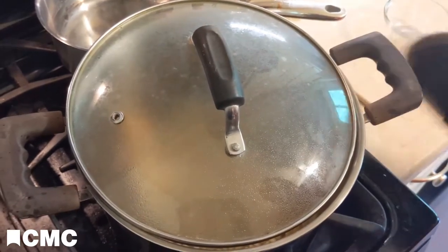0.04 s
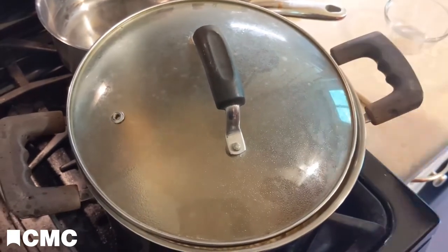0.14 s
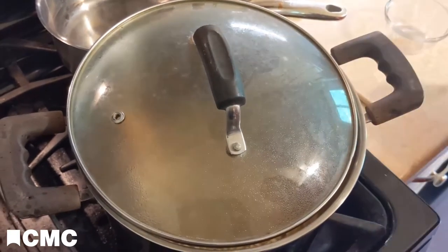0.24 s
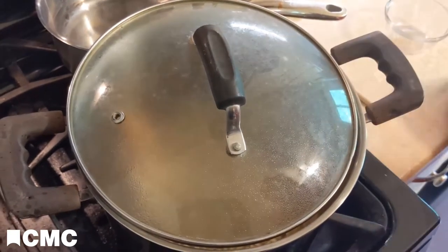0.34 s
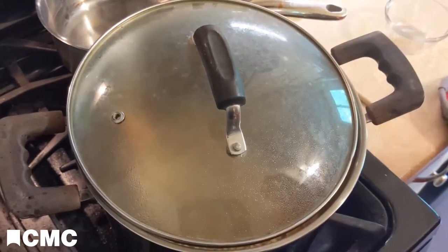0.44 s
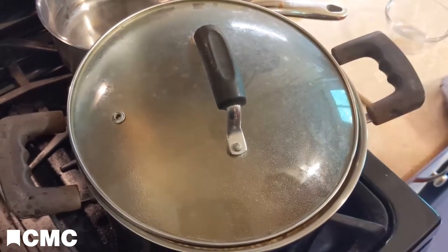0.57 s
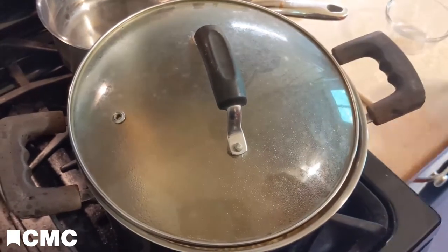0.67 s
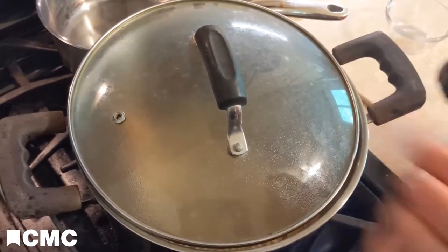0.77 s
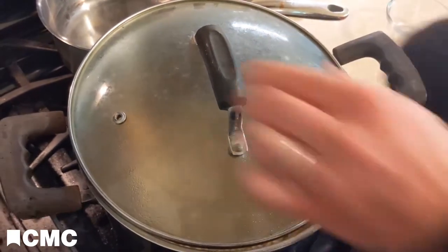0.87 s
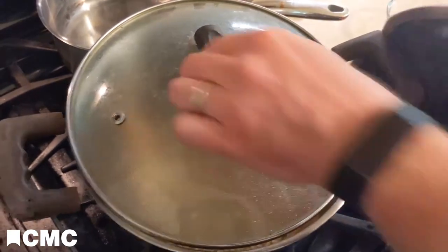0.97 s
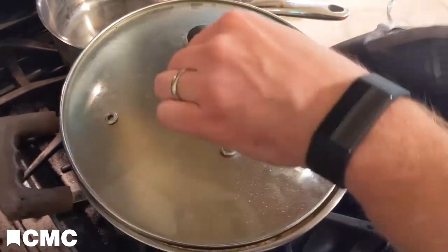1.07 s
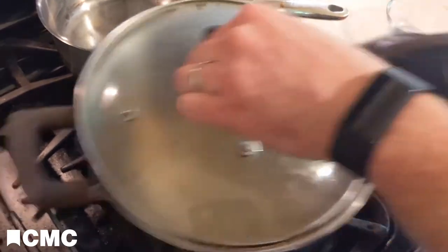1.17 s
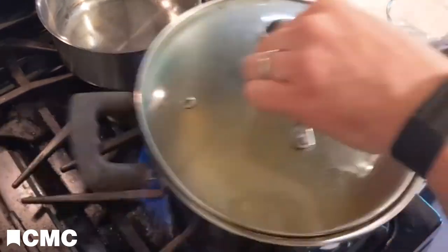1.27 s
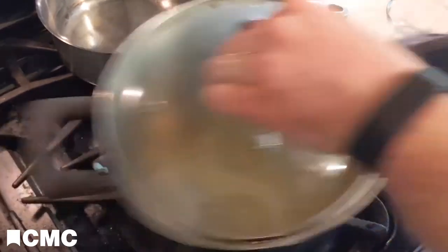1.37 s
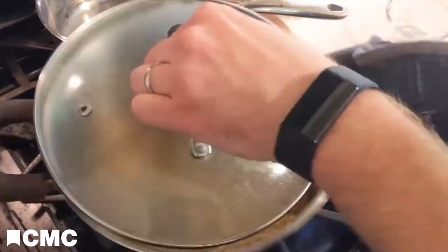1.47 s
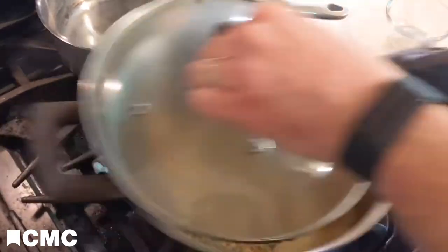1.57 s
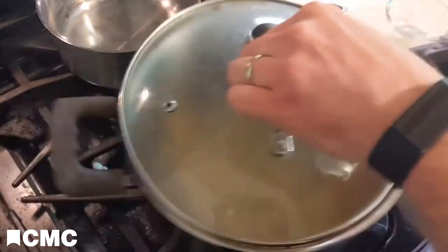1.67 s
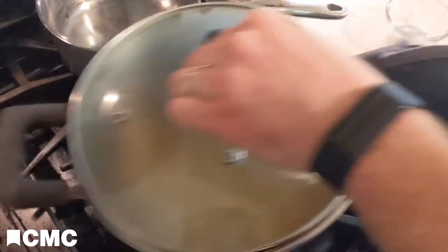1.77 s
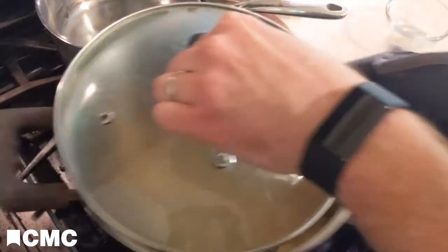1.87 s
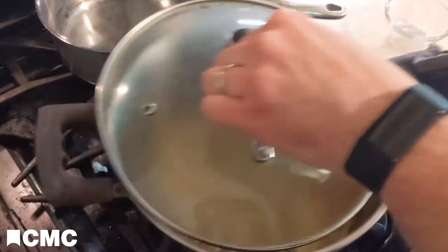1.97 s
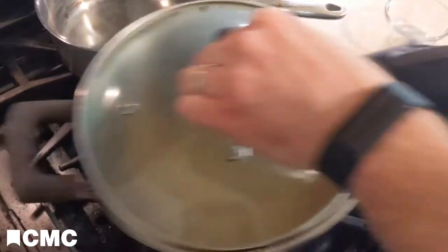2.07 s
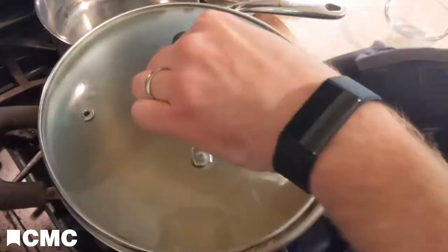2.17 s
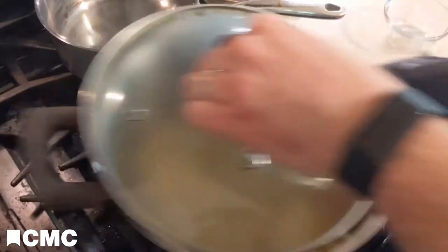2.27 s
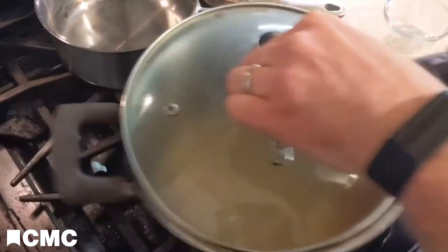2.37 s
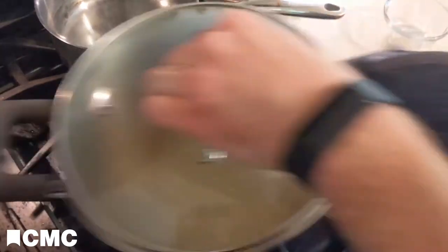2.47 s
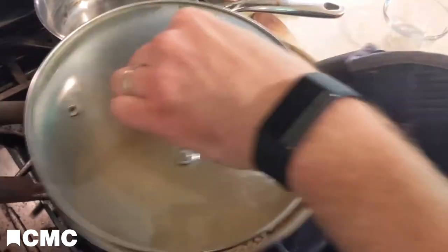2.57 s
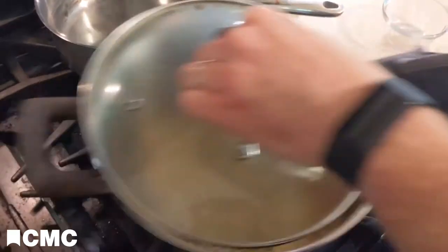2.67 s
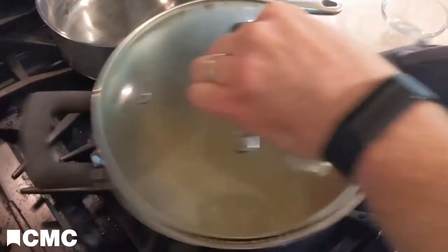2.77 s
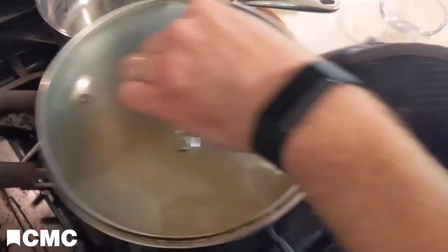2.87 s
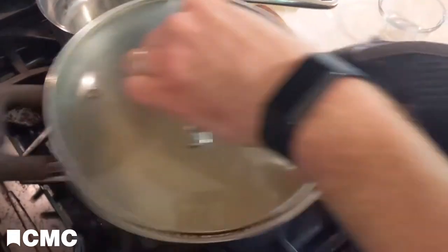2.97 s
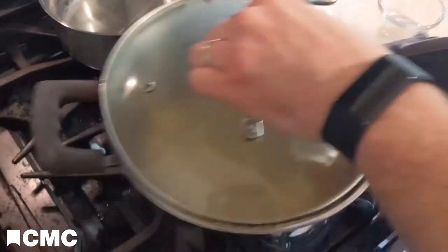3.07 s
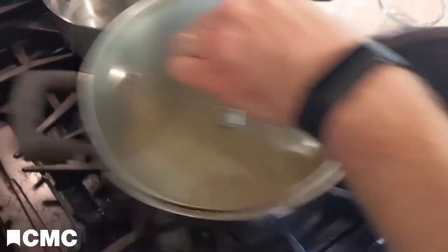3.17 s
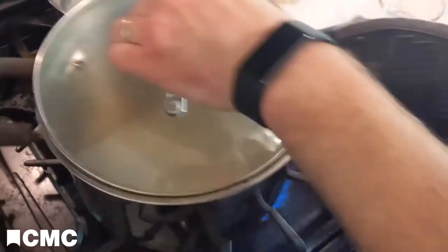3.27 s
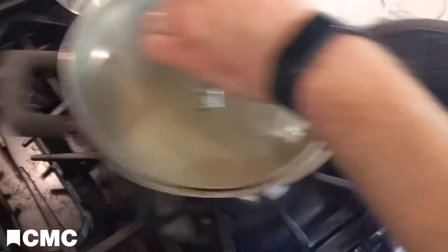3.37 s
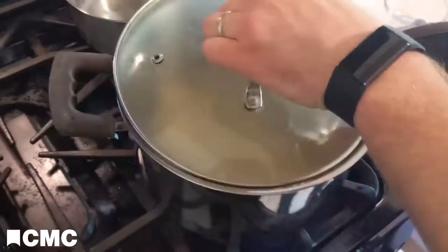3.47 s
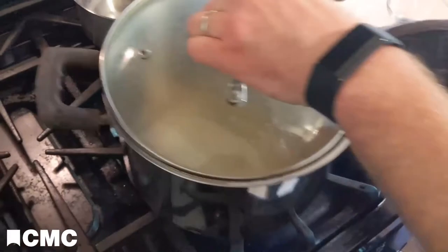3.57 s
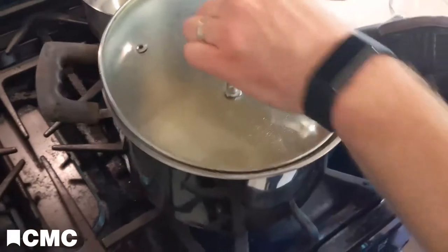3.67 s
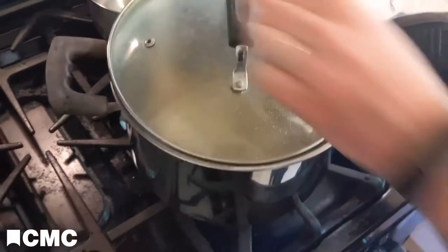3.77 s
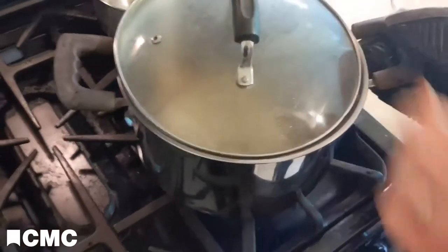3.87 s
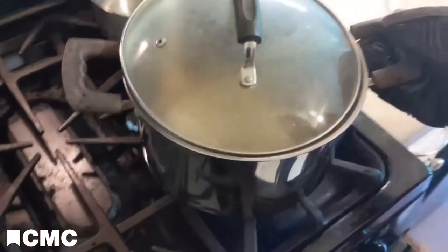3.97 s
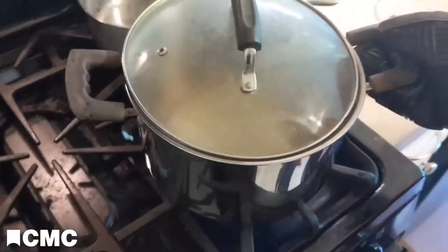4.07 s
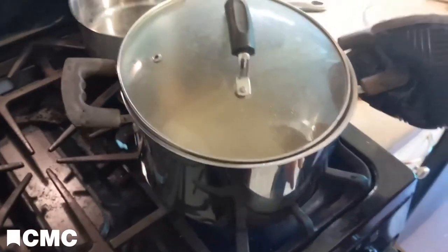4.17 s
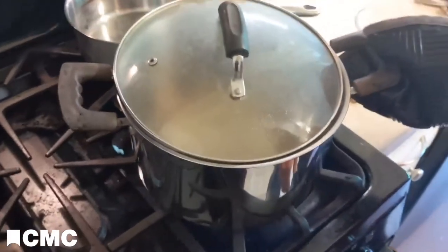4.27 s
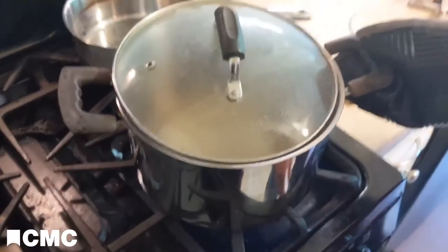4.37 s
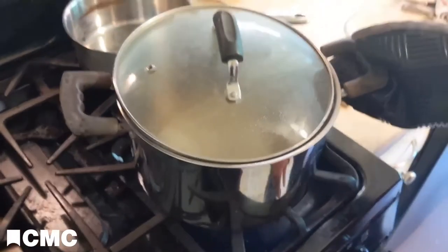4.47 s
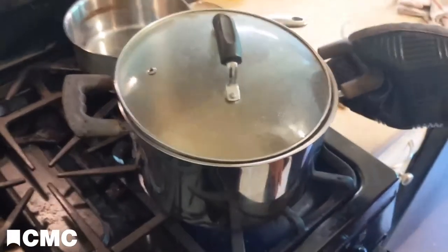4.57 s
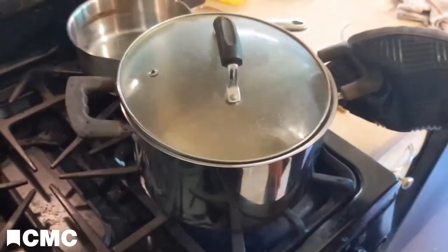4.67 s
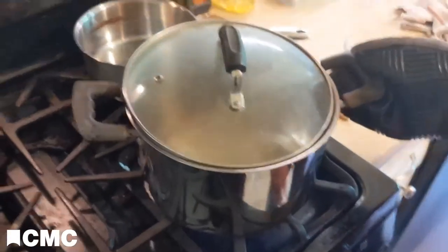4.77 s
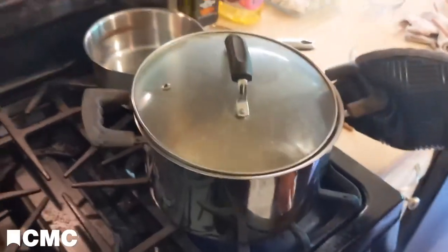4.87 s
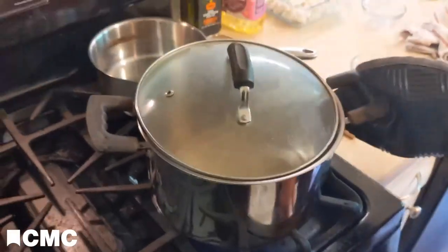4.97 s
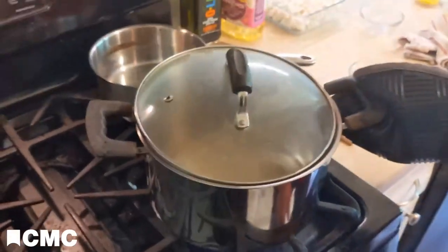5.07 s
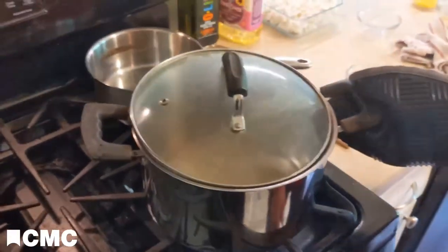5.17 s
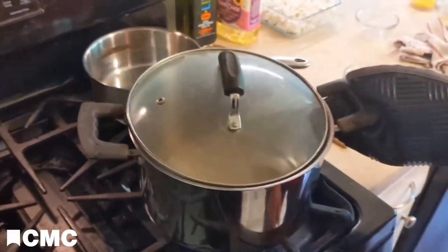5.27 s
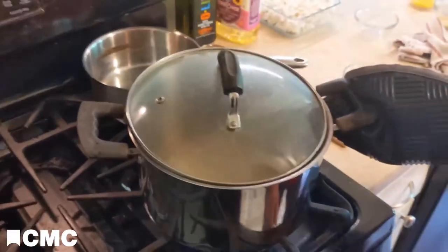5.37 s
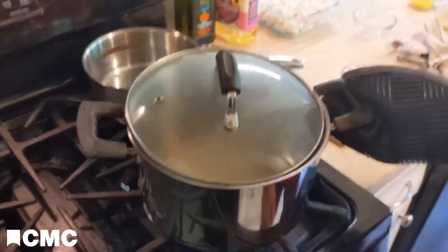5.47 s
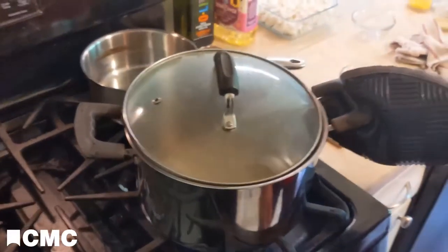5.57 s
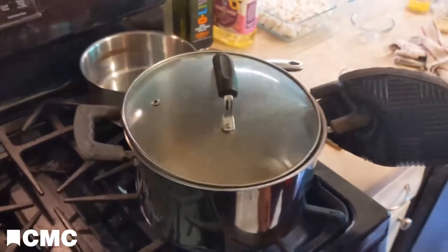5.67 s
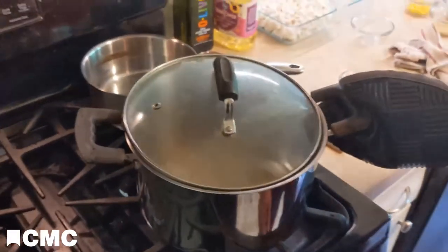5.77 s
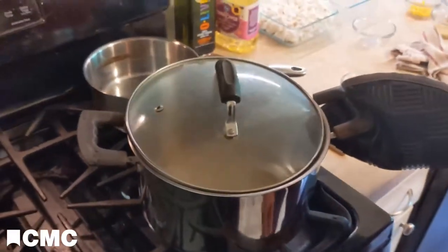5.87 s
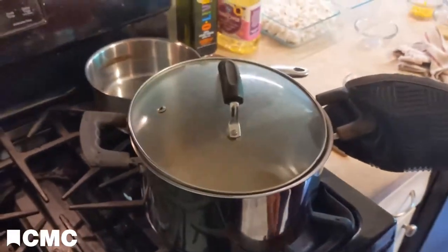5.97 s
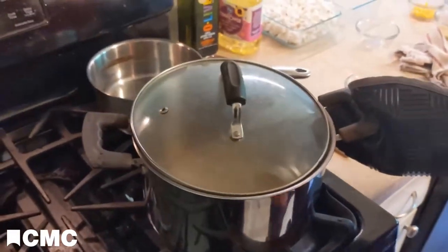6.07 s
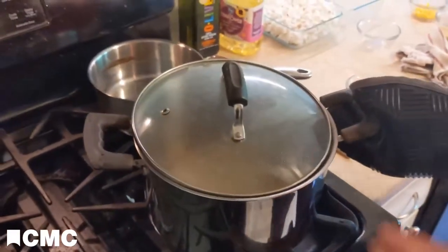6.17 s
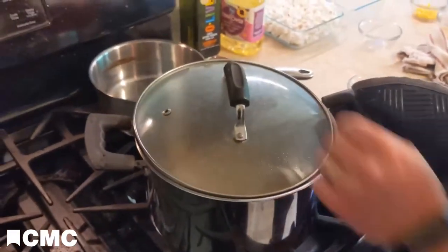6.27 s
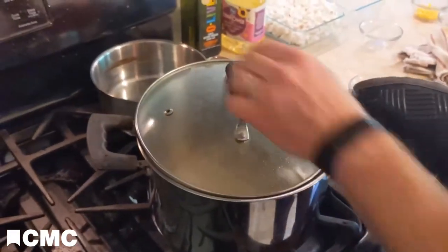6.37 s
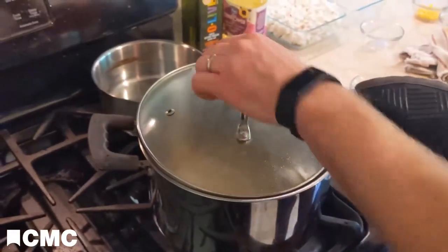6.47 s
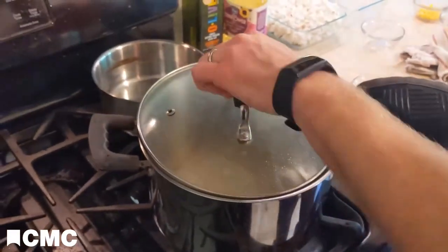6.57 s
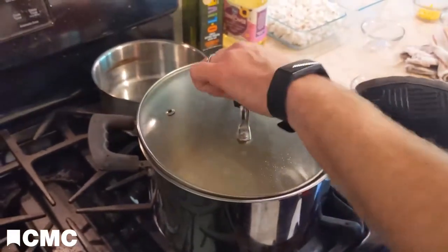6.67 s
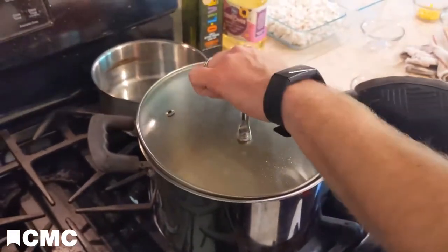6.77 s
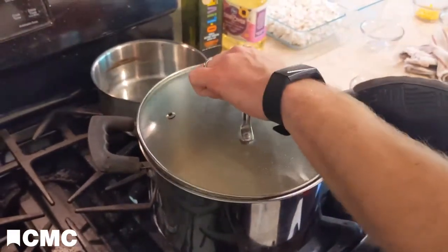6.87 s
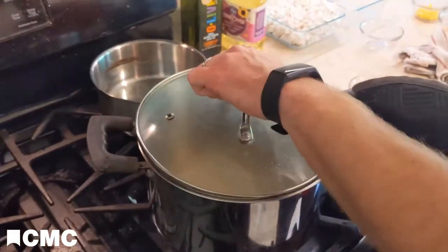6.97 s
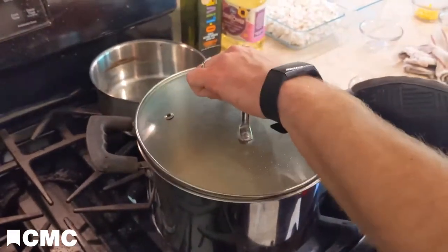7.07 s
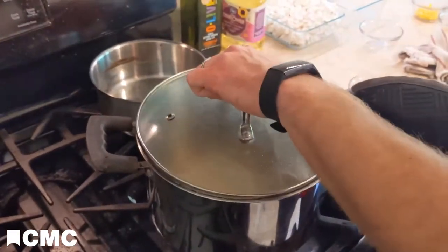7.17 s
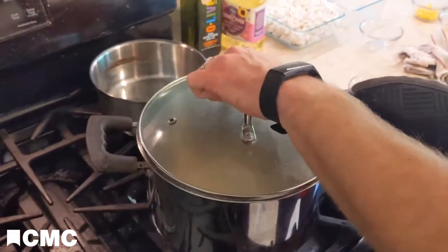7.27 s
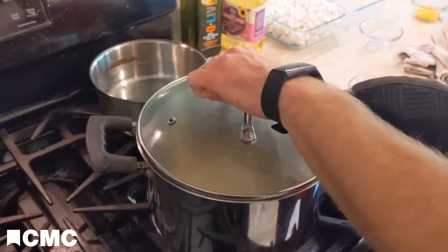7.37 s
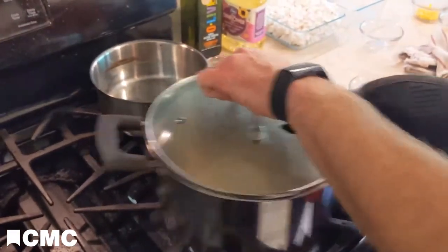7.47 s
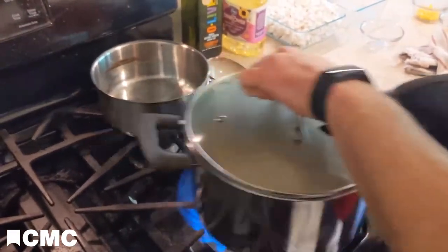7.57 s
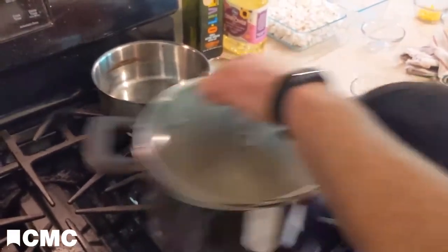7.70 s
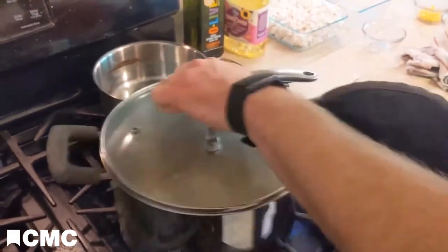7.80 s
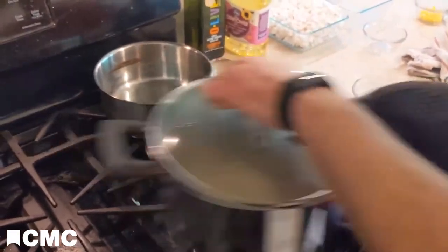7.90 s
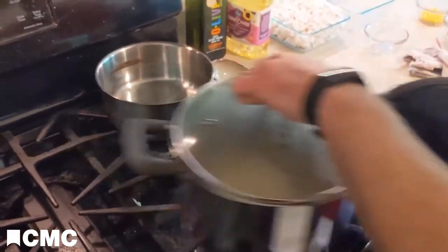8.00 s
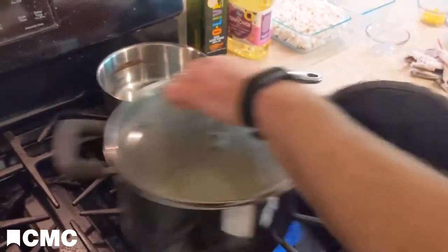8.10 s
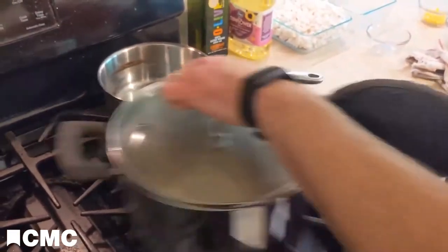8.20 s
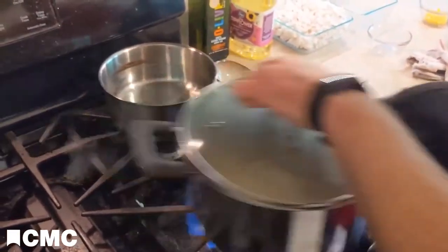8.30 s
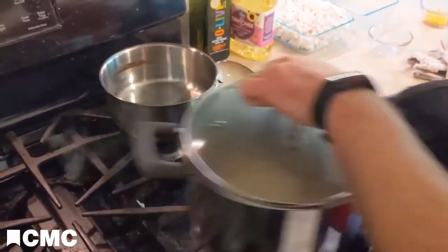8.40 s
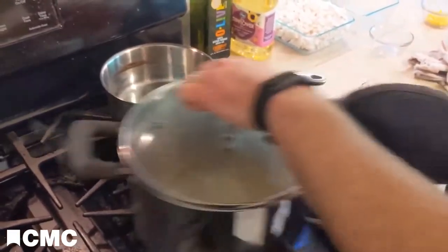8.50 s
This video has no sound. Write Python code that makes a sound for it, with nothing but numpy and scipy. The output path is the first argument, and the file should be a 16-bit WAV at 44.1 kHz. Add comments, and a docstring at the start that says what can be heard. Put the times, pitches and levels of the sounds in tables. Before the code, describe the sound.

Kernels sizzle and spit in hot oil inside a lidded steel pot, which is shaken in two bouts, scraping and knocking on an iron grate.

```python
"""Soaked popcorn kernels sizzle and spit in hot oil in a steel pot under a glass lid, close to a hand-held camera.
At first the oil only simmers. From about 1 s the pot is shaken over its iron grate: it scrapes and knocks, and
the oil flares up. From about 4 s the hiss sinks and spits go on; just before 7 s a second shake starts.
Bubbles are swarms of noise grains; blows are noise bursts that ring the pot, and every spit rings its wall.
The burner and the kitchen murmur underneath, and two microphones hear it all."""
import sys
import numpy as np
from scipy import signal
from scipy.fft import rfft, irfft, next_fast_len
from scipy.io import wavfile
from scipy.ndimage import map_coordinates

SR = 44100
rng = np.random.default_rng(int(sys.argv[2]) if len(sys.argv) > 2 else 0)


def log_audio(samples):
    """Write samples as a 16-bit WAV file to the path given in sys.argv[1]."""
    # one column per channel
    frames = np.atleast_2d(samples).T
    # limit to full scale, then quantise
    limited = np.clip(frames, -1, 1)
    pcm = np.round(limited * 32767).astype(np.int16)
    wavfile.write(sys.argv[1], SR, pcm)


N = 376613
T = np.arange(N) / SR


def amp(db):
    """Decibels to gain."""
    return 10 ** (np.asarray(db) / 20)


def unit(x):
    """Scales each channel to rms 1."""
    return x / np.sqrt(np.mean(x ** 2, -1, keepdims=True) + 1e-20)


def read(points, hz):
    """Reads a table on a log-frequency axis."""
    f, value = np.transpose(points)
    return np.interp(np.log(hz + 1), np.log(f), value)


def add(mix, s, sound):
    """Mixes a sound in at time s."""
    part = mix[:, max(round(s * SR), 0):][:, :sound.shape[-1]]
    part += sound[..., :part.shape[-1]]


def sides(left_minus_right_db):
    """Gains of the left and right channel, split evenly around 0 dB."""
    return amp([[left_minus_right_db / 2], [-left_minus_right_db / 2]])


def through(x, response):
    """Convolves with a response scaled to energy 1."""
    response = np.atleast_2d(unit(response)) / np.sqrt(response.shape[-1])
    return signal.oaconvolve(x, response, axes=1)[:, :x.shape[1]]


def colour(x, points, size=4096):
    """Minimum-phase filter with the shape of the given spectrum; its energy is scaled to 1."""
    log_gain = np.log(amp(read(points, abs(np.fft.fftfreq(size, 1 / SR)))))
    spectrum = np.exp(np.conj(signal.hilbert(log_gain)))
    return through(x, np.fft.ifft(spectrum).real[:size // 2])


def dying(modes):
    """One row a mode: a complex tone that dies away exponentially."""
    hz, db, t60 = np.transpose(modes)[:, :, None]
    t = T[:SR // 4]
    # dividing by the root of t60 makes the level one of energy, not of peak
    return amp(db - 60 * t / t60) / np.sqrt(t60) * np.exp(2j * np.pi * hz * t)


def struck(tones, detune=.003):
    """Each spot excites the modes in other shares and phases; the sloshing oil shifts their pitch a little."""
    weights = rng.standard_normal((2, len(tones))) + 1j * rng.standard_normal((2, len(tones)))
    weights /= np.sqrt(abs(weights))  # evens out the shares
    steps = np.arange(tones.shape[1])
    speed = 1 + detune * rng.standard_normal()
    return np.array([np.interp(steps * speed, steps, side, right=0) for side in (weights @ tones).real])


def ring(x, response, ring_db):
    """A body passes the blow on and rings."""
    return (x + amp(ring_db) * through(x, response)) / np.hypot(1, amp(ring_db))


def flutter(rate, depth_db):
    """Random gain of rms 1 that wanders mostly slower than rate times a second."""
    hz = np.fft.rfftfreq(N, 1 / SR)[:2000]
    spectrum = rfft(rng.standard_normal(4096))[:len(hz)] / (1 + (hz / rate) ** 2)
    wander = unit(irfft(spectrum, 8192))
    return unit(amp(depth_db * np.interp(T, np.linspace(0, T[-1], len(wander)), wander)))


def grains(per_s, spread_db, life):
    """A swarm of tiny noise bursts of uneven size, each dying in about life seconds; rms 1."""
    sizes = amp(spread_db * np.minimum(rng.exponential(1, N), 5)) * (rng.random(N) < per_s / SR)
    power = signal.lfilter([1], [1, -np.exp(-2 / (life * SR))], sizes ** 2)
    return unit(np.sqrt(power) * rng.standard_normal((2, N)))


def burst(rise, decay, linger_db, linger):
    """A scattered blow: quick swell, quick fall and a weaker lingering end; times in seconds."""
    t = T[:SR // 4]
    shape = (1 - np.exp(-t / rise)) * (np.exp(-t / decay) + amp(linger_db) * np.exp(-t / linger))
    return shape / shape.max() * rng.standard_normal((2, len(t)))


def swell(start, length, rise, fall):
    """Rises smoothly from 0 to 1, holds, and is back at 0 after length seconds."""
    edges = np.minimum((T - start) / rise, (start + length - T) / fall)
    return np.sin(np.pi / 2 * np.clip(edges, 0, 1))


# spectrum of the fine hiss, also of the spray: pitch_hz, relative level_db
HISS = [(2000, -40), (4000, -15), (7000, -7), (9000, -1), (10800, 0), (13000, -2), (16000, -4)]
# spectrum of the coarse bubbles: pitch_hz, relative level_db
BUBBLING = [(500, -12), (900, -9.5), (1150, -5.5), (1800, -5.5), (2600, -2), (3600, 0.5), (5100, 2),
            (6500, 4), (8000, -7.5), (12000, -13)]
# ringing of pot and lid: pitch_hz, relative level_db, t60_s
POT = [(517, -22, .5), (1160, -2, .2), (1195, -3, .2), (1588, -5, .2), (1906, -4, .11), (2035, -2, .14),
       (2330, -8, .12), (2555, -5, .1), (2601, -4, .14), (2767, -9, .11), (3060, -9, .08), (3135, -6, .1),
       (3618, -5, .11), (3779, -9, .08), (4073, -7, .08), (4250, -6, .06), (4572, -7, .05), (4775, -7, .07),
       (5106, -4, .08), (5200, -8, .045), (5688, -9, .05), (6046, -9, .05), (6374, -7, .05)]


def sizzle():
    """Countless small bubbles hiss; fewer large ones crackle and set the pot ringing."""
    hiss_db, bubble_db = oil()
    surge = flutter(rate=12, depth_db=1.14)
    hiss = grains(per_s=2000, spread_db=4.0, life=0.012) * amp(hiss_db + 1.5)
    bubbles = grains(per_s=350, spread_db=1.2, life=0.014) * amp(bubble_db - 3.0)
    bubbles = ring(bubbles * surge, struck(dying(POT)), ring_db=-6.5)
    bubbles = bubbles + ticks(bubble_db, count=110, level_db=-2.0)
    return colour(hiss * surge, HISS) * sides(-0.6) + colour(bubbles, BUBBLING) * sides(2.2)


# how lively the oil is; it rises as the pot is shaken and settles afterwards: time_s, hiss level_db before trim
LIVELINESS = [(0, -44.5), (.7, -44.5), (.95, -46), (1.3, -43), (1.5, -34), (1.85, -35.5), (2.35, -30),
              (2.6, -34), (2.8, -33), (3.2, -35.5), (3.9, -35.5), (4.5, -41), (4.85, -44), (5.5, -43),
              (5.8, -46), (6.15, -41), (6.6, -46.5), (7.5, -48.5), (7.85, -44), (8.54, -45)]
# wet kernels meet hot steel and the oil flares up: start_s, length_s, lift_db
FLARES = [(0.994, .13, 5.5), (1.4, 0.36, 5), (1.608, .15, 6.5), (1.886, 0.26, 8), (3.042, .09, 5),
          (3.956, .1, 4.5), (5.06, 0.21, 2.5), (6.368, 0.17, 4)]
FLARE_RISE_S, FLARE_FALL_S = 0.071, 0.047
BUBBLING_DB, BUBBLING_FLARE_SHARE = -1.5, 0.51  # coarse bubbles lie under the hiss and take part of a flare


def oil():
    """Levels of the fine hiss and the coarse bubbling in dB: the oil's liveliness plus its flares."""
    lively_db = np.interp(T, *np.transpose(LIVELINESS))
    flare_db = sum(db * swell(s, length, FLARE_RISE_S, FLARE_FALL_S) for s, length, db in FLARES)
    return lively_db + flare_db, lively_db + BUBBLING_DB + BUBBLING_FLARE_SHARE * flare_db


def ticks(bubble_db, count, level_db):
    """Small droplets burst here and there on the base, as strong as the oil is lively."""
    out, pot = np.zeros((2, N)), dying(POT)
    for when, size in rng.random((count, 2)):
        at = when * T[-1]
        tick = burst(rise=0.00055, decay=0.0069, linger_db=-12, linger=0.072)
        tick_db = np.interp(at, T, bubble_db) + level_db + 7.6 * size
        add(out, at, amp(tick_db) * ring(tick, struck(pot), ring_db=-1.0))
    return out


# water bursting in the oil, levels before each layer's trim: start_s, level_db,
# then relative to it spray_db, thump_db, tock_db of the wall; decay_s is the die-away time constant
SPITS = [(0.0866, -38, 9.5, -33, -15, 0.012), (0.1733, -42, -10, -27, -7, .01),
         (0.3062, -38, 6, -32, -15, 0.013), (0.5256, -34, 1, -15, -9, 0.046),
         (0.73, -35.5, -3, -18.5, -6, 0.053), (0.7772, -27, -6, -9, -3, 0.013),
         (1.161, -48.5, 18.5, -24, -17, 0.028), (1.2363, -14.5, -11, -12, -21.5, 0.0057),
         (2.2757, -15, -3.5, -30, -27, .0064), (2.3573, -14, -3, -37, -19, 0.008),
         (2.475, -16.5, 2, -28, -18, 0.008), (2.6554, -15, 5, -12, -18, .017),
         (3.2163, -23.5, 10.5, -27, -26, 0.0057), (3.3832, -13.5, -30, -29, -19, 0.0053),
         (3.6383, -17.5, 1, -17, -22, 0.015), (3.6693, -19.5, 6.5, -17, -22, 0.015),
         (4.1833, -44.5, 17, 1, -14, 0.0063), (4.5399, -37, -12, -29, -11.5, .015),
         (4.672, -41, 12.5, -31, -36, 0.013), (4.8623, -32.5, -5, -26, -16, 0.027),
         (5.049, -23, -2, -19, -24, .0092), (5.1517, -30.5, -6, -28, -19, 0.021),
         (5.2508, -37, 1, -28, -12, 0.0063), (5.581, -18, -10, -15, -18, 0.0042),
         (5.7172, -37, 8, -33, -31, 0.016), (6.1109, -24, -6, -21, -34, 0.013),
         (6.2827, -36, 6.5, -30, -18, 0.0076), (6.6578, -38.5, 5.5, -28, -18, 0.018),
         (7.008, -21, -10, -28, -34, 0.0052), (7.138, -39.5, 8, -30, -29, .0071),
         (7.203, -28, -5, -21, -15, 0.02), (7.447, -45, 8, -13, -22, 0.0071)]
# spectrum of the crack: pitch_hz, relative level_db
BURST = [(400, -18.5), (850, -8.5), (1150, -10.5), (1800, -2.5), (2600, -1), (4500, 3), (6300, 2),
         (8000, -5.5), (12000, -13)]
# spectrum of the thump under the lid: pitch_hz, relative level_db
THUMP = [(25, -28), (70, -1), (150, -9), (250, 6), (400, -9.5), (700, -21), (1500, -16.5)]


def spits():
    """A drop flashes to steam: a crack in the pot, fizzing oil spray, a thump of the air under the lid, a wall tock."""
    crack, spray, thump, wall = np.zeros((4, 2, N))
    pot, pan = dying(POT), sides(3.0)
    for s, db, spray_db, thump_db, tock_db, decay in SPITS:
        blow = burst(rise=0.00098, decay=decay, linger_db=-16.5, linger=0.072)
        add(crack, s, pan * amp(db - 5.5) * ring(blow, struck(pot), ring_db=-3.0))
        fizz = burst(rise=.001, decay=decay, linger_db=-20, linger=.05)
        add(spray, s, amp(db + spray_db - 1.5) * fizz)
        puff = burst(rise=0.00065, decay=0.01, linger_db=-19, linger=0.061)
        add(thump, s, amp(db + thump_db + 1.0) * puff)
        add(wall, s, pan * amp(db + tock_db + 4.5) * tock())
    return colour(crack, BURST) + colour(spray, HISS) + colour(thump, THUMP) + wall


# lowest wall modes, struck by the spits: pitch_hz, relative level_db, t60_s
TOCK = [(1163.5, -1, 0.11), (1162.5, 0.5, 0.086), (1156, -7.5, 0.2)]


def tock():
    """One clean blow on the wall's lowest modes, 1 at its peak."""
    tones = struck(dying(TOCK)) * (1 - np.exp(-T[:SR // 4] / 0.0015))
    return tones / abs(tones).max(1, keepdims=True)


# pushes and pulls of the pot over the grate: start_s, length_s, scrape level_db,
# kernels_db of the sliding kernels relative to it (before trim)
STROKES = [(0.968, 0.17, -64, 7), (1.096, .13, -50.5, -1), (1.211, 0.24, -41.5, -9),
           (1.411, .19, -42.5, 11), (1.577, 0.19, -37.5, -7), (1.734, .23, -40, 0), (1.952, .16, -41, 1.5),
           (2.085, .23, -41, -3), (2.306, .42, -41, -5), (2.714, 0.33, -42, 2), (3.045, .18, -42, 4),
           (3.236, .19, -44, 6.5), (3.407, 0.18, -40, -3), (3.576, 0.33, -57, -6),
           (6.884, 0.28, -58.5, 3.5), (7.23, .26, -51, -2), (7.512, 0.3, -48, 8.5), (7.71, .2, -47.5, 17),
           (7.897, 0.22, -38.5, 5), (8.087, 0.23, -43, 10.5), (8.334, .17, -45, 7.5),
           (8.488, .17, -42.5, 10.5)]
STROKE_RISE_S, STROKE_FALL_S = 0.044, 0.14
# the pot bumping the grate, levels before trim: start_s, level_db, then relative to it clank_db and stove boom_db
KNOCKS = [(0.424, -45, -4, -19), (0.982, -39.5, -6, -16), (1.454, -22, -6, -11), (1.489, -21, -2, -11.5),
          (1.623, -25, -25, -17), (1.756, -29, -0.5, -20), (2.356, -26, -15, -31), (2.499, -20.5, -26, -18),
          (2.746, -17, -8, -18), (3.085, -23, -15, -16), (7.257, -39.5, 4, -5), (7.352, -30.5, -11, -30),
          (7.373, -37, -7, 1), (7.514, -39, -2, 3), (7.612, -19, -9, -13), (7.734, -26, -27, -13),
          (7.776, -16.5, -5.5, -16), (8.154, -16.5, -7.5, -16), (8.198, -27, -10, -13),
          (8.373, -27.5, -10, -30), (8.391, -15.5, -11, -16)]
# hollow ringing of the pot's air, the grate and the stove top: pitch_hz, relative level_db, t60_s
GRATE = [(185, 2, .1), (225, -4, .08), (300, -5, .08), (352, 1, .08), (460, -9, .05), (558, 0, .06),
         (746, -6, .05), (851, -5, .06), (971, -8, .05), (1150, -4, .06)]
# spectra of the grinding base, sliding kernels, knocks, clanking pot, booming stove: pitch_hz, relative level_db
SCRAPE = [(60, -35), (140, -12.5), (230, -4.5), (330, 4), (430, -6), (560, 2.5), (750, 1), (1100, -13),
          (2000, -2.5), (6000, -62)]
SLIDE = [(300, -25), (550, -2), (800, -3.5), (1150, 0.5), (1600, -11), (3000, -9), (6000, -18),
         (12000, -50)]
KNOCK = [(50, -21), (150, -7), (350, 0), (800, 0), (1200, -0.5), (1700, -8.5), (3000, -13.5), (8000, -22.5)]
CLANK = [(700, -45), (1500, -1), (2200, 8.5), (4200, 6.5), (6300, 5), (8000, -2.5), (15000, -14)]
BOOM = [(15, -32), (42, -1.5), (70, -3.5), (110, -8), (180, -4), (400, -41)]
# the stove's rumble grows more slowly than the grinding: its level when the grinding is at PIVOT_DB, and dB per dB
RUMBLE_DB, PIVOT_DB, RUMBLE_SLOPE = -53.5, -40, 0.65


def shaking():
    """The base grinds and bumps on the grate while kernels slide inside; the stove booms and the pot clanks."""
    knock, clank = np.zeros((2, 2, N))
    scraping, sliding = np.zeros((2, N))
    for s, length, db, kernels_db in STROKES:
        push = amp(db) * swell(s, length, STROKE_RISE_S, STROKE_FALL_S)
        scraping += push
        sliding += amp(kernels_db) * push
    catching = flutter(rate=15, depth_db=0.5)  # the base sticks and slips
    scrape = grains(per_s=670, spread_db=1.5, life=0.0023) * scraping * catching
    slide = grains(per_s=650, spread_db=1.5, life=0.0016) * sliding * catching * amp(-5.0)
    rumble = amp(RUMBLE_DB) * (np.hypot(scraping, sliding) / amp(PIVOT_DB)) ** RUMBLE_SLOPE
    boom = rng.standard_normal((2, N)) * flutter(rate=15, depth_db=2.5) * rumble
    pot = dying(POT)
    for s, db, clank_db, boom_db in KNOCKS:
        bump = burst(rise=0.00072, decay=0.028, linger_db=-13, linger=0.084)
        add(knock, s, amp(db - 7.0) * bump)
        rattle = burst(rise=0.0031, decay=0.024, linger_db=-10, linger=0.057)
        add(clank, s, amp(db + clank_db - 4) * ring(rattle, struck(pot), ring_db=-12))
        thud = burst(rise=0.002, decay=0.019, linger_db=-2, linger=0.076)
        add(boom, s, amp(db + boom_db - 4.5) * thud)
    grinding = colour(scrape, SCRAPE) + colour(slide, SLIDE) + colour(knock, KNOCK)
    # long waves reach both microphones in step, so both sides share one ringing
    iron = ring(grinding, dying(GRATE).real.sum(0), ring_db=-16.5)
    return (iron + colour(clank, CLANK) + colour(boom, BOOM)) * sides(2.6)


# hand and mitt squeaking on the handles: start_s, level_db, pitch_hz, length_s
RUBS = [(0.408, -55.5, 1890, 0.067), (6.905, -46.5, 2430, 0.066), (6.917, -49, 4200, 0.047),
        (7.262, -39.5, 4500, .04), (7.368, -52, 4400, 0.029)]
# soft thuds of handling: start_s, level_db
THUDS = [(0.449, -55), (0.781, -37), (2.659, -41), (3.667, -49), (6.432, -58)]


def handling():
    """Short squeaks on the handles are noise through a sharp resonance; dull thuds are low noise bursts."""
    rubs, thuds = np.zeros((2, 2, N))
    for s, db, hz, length in RUBS:
        noise = rng.standard_normal((2, round(length * SR)))
        resonance = signal.iirpeak(hz, 8, SR)
        rasp = signal.lfilter(*resonance, signal.lfilter(*resonance, noise))
        add(rubs, s, amp(db) * unit(rasp * signal.windows.tukey(rasp.shape[1], .7)))
    for s, db in THUDS:
        add(thuds, s, amp(db) * burst(rise=0.004, decay=0.024, linger_db=-25, linger=0.05))
    return rubs + colour(thuds, BOOM)


# spectrum of flame and kitchen: pitch_hz, relative level_db
MURMUR = [(12, -24), (20, 6), (75, 1), (98, -8.5), (163, -8.5), (253, 0), (400, -10.5), (520, -6),
          (546, -21.5), (721, -8), (1000, -24), (1300, -42), (2200, -120)]
MURMUR_DB = -61


def murmur():
    """Low steady noise of the gas flame and the kitchen."""
    noise = rng.standard_normal((2, N)) * flutter(rate=14, depth_db=0.5)
    return amp(MURMUR_DB) * colour(noise, MURMUR) * sides(2.4)


def kitchen(x, t60, wet_db):
    """A short diffuse tail from the hob, hood and walls."""
    t = T[:SR // 2]
    tail = rng.standard_normal((2, len(t))) * amp(-60 * t / t60) * (t > .004)
    return x + amp(wet_db) * through(x, tail)


# how alike the two microphones hear: pitch_hz, likeness (0-1)
LIKENESS = [(60, 0.83), (330, 0.84), (650, 0.79), (1400, 0.24), (4000, 0.12), (15000, 0.2)]
# lead of the left microphone as the camera moves: time_s, lead_ms
LEAD = [(0, 0.017), (.9, 0.091), (1.4, .27), (2.3, .29), (3.6, 0.22), (4.2, 0.023), (6.6, 0.0068),
        (7.2, 0.19), (7.8, 0.2), (8.3, 0.28)]
# sound common to both microphones: pitch_hz, left minus right level_db
BALANCE_DB = [(60, 2), (130, 6.5), (270, 2), (550, 2), (1200, 20.5), (4000, 2), (10000, 9)]


def microphones(x):
    """Both ports hear nearly the same bass but mostly different reflections in the treble; the left one leads."""
    size = next_fast_len(N)
    hz = np.fft.rfftfreq(size, 1 / SR)
    same = np.clip(read(LIKENESS, hz), 0, 1)
    left, right = rfft(x, size)
    shared = same * left / amp(read(BALANCE_DB, hz))
    right = irfft(shared + np.sqrt(1 - same ** 2) * right, size)[:N]
    delay = np.interp(T, *np.transpose(LEAD)) * SR / 1000  # ms to samples
    return np.array([x[0], map_coordinates(right, [np.arange(N) - delay], order=3)])


def scene():
    """The pot on the stove, heard from just above the lid."""
    cooking = sizzle() + spits() + shaking() + handling()
    heard = kitchen(cooking, t60=.33, wet_db=-12)
    return microphones(heard + murmur())


EDGE_HZ = 16200


def record(dry):
    """The recorder's band limit: a steep low-pass."""
    lowpass = signal.firwin(511, EDGE_HZ, window=("kaiser", 9), fs=SR)
    return signal.oaconvolve(dry, lowpass[None], "same")


dry = scene()
out = record(dry)
log_audio(out)
```